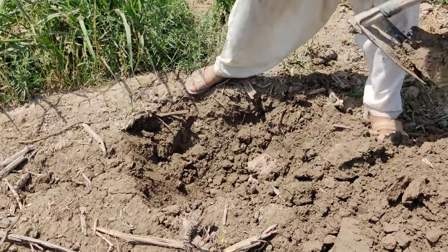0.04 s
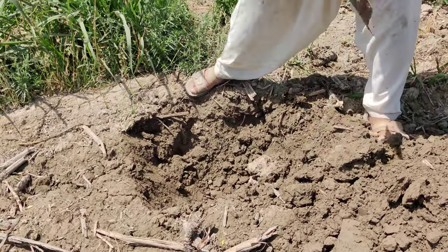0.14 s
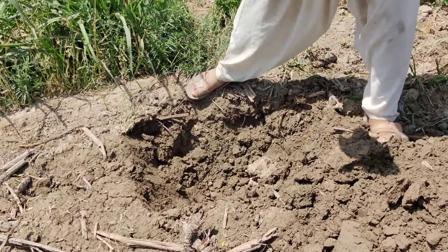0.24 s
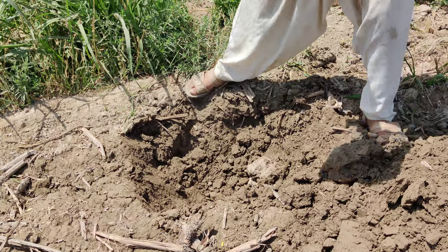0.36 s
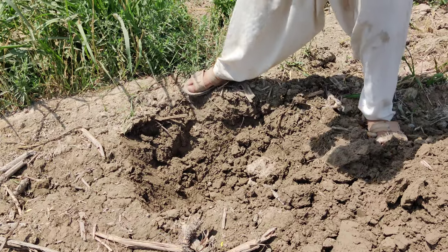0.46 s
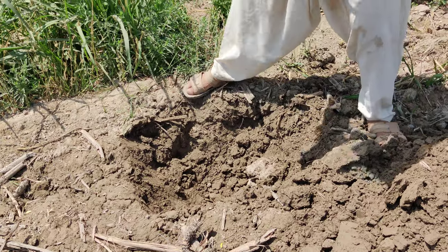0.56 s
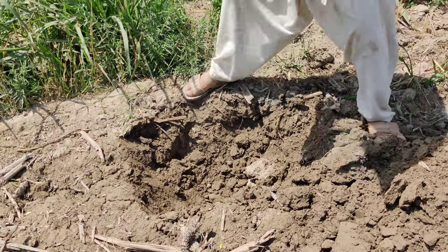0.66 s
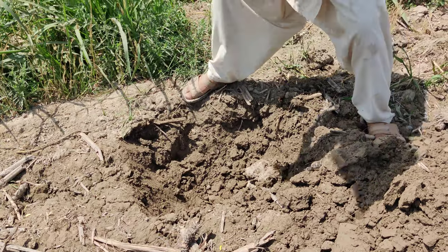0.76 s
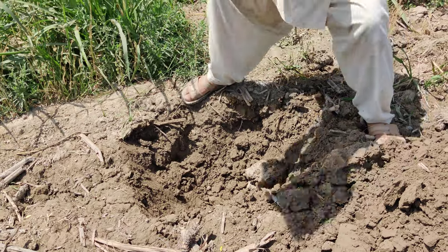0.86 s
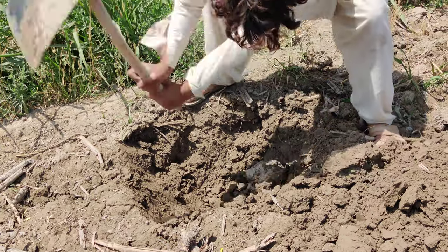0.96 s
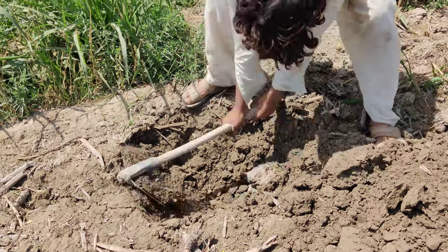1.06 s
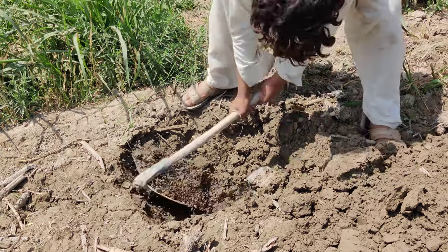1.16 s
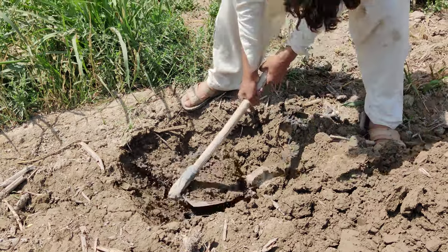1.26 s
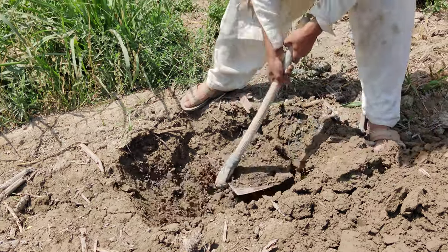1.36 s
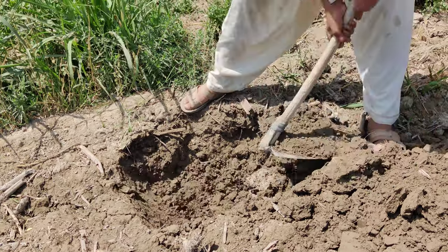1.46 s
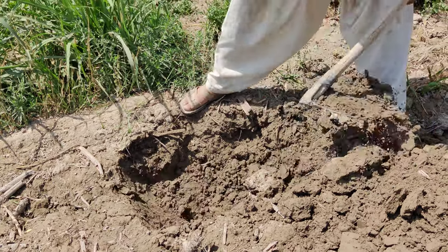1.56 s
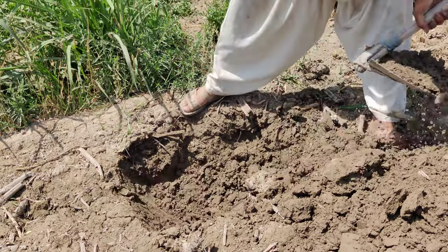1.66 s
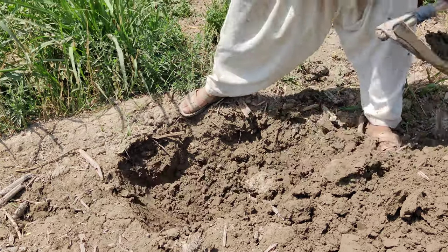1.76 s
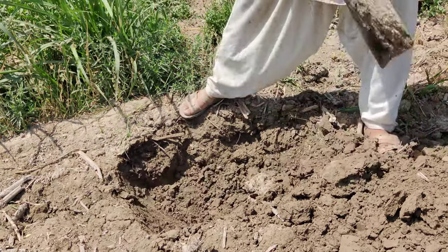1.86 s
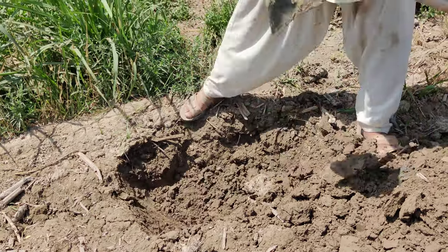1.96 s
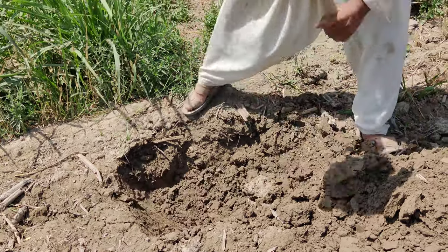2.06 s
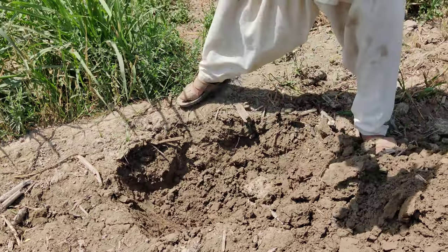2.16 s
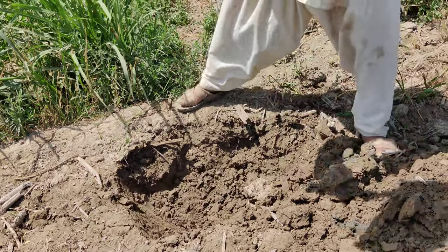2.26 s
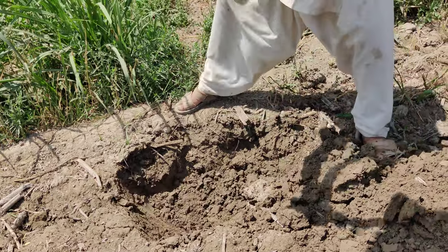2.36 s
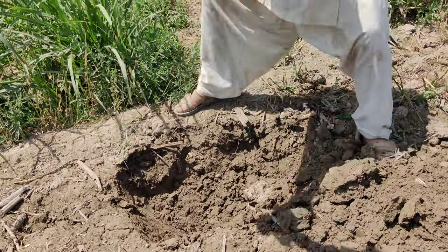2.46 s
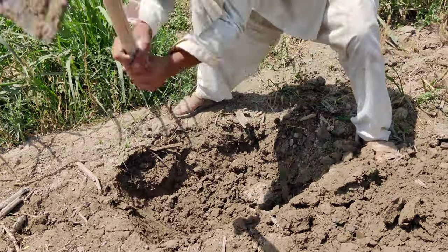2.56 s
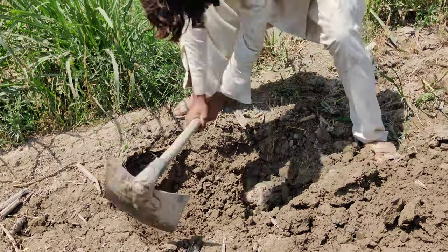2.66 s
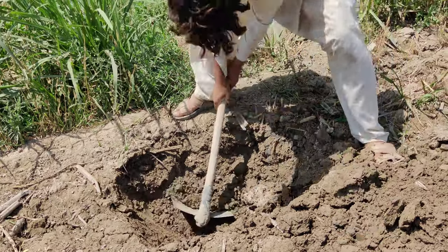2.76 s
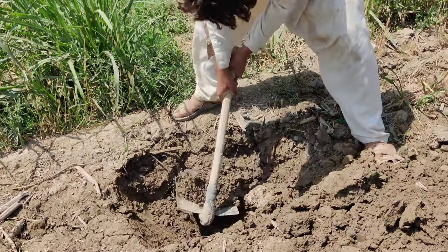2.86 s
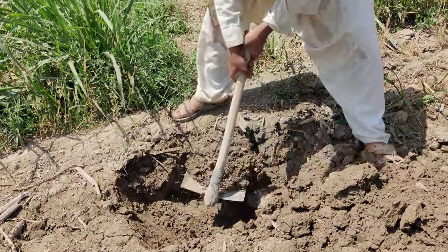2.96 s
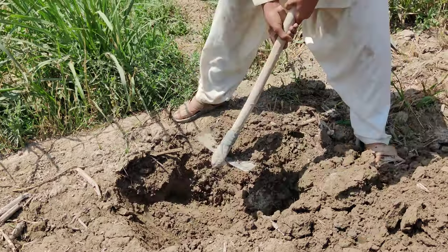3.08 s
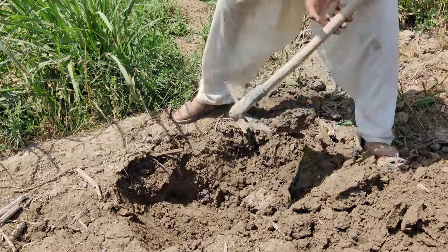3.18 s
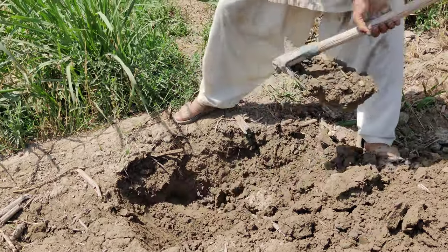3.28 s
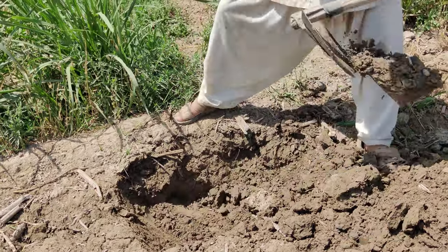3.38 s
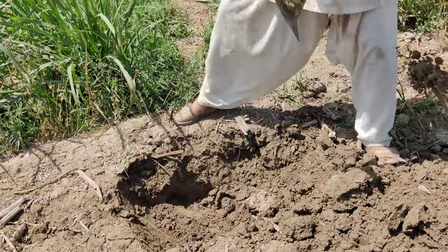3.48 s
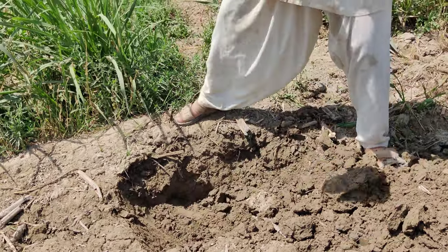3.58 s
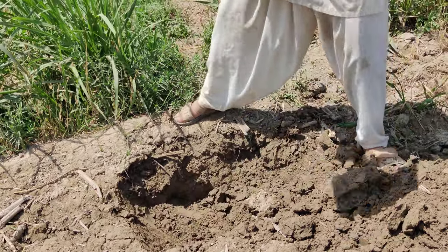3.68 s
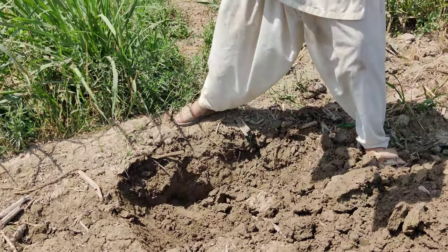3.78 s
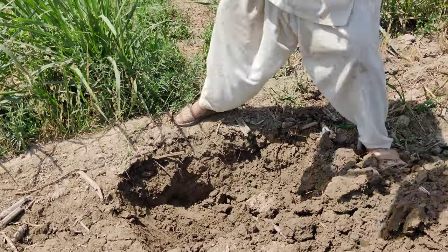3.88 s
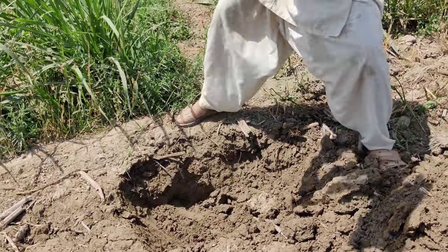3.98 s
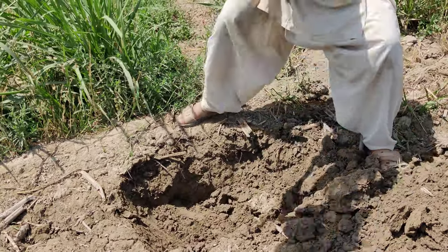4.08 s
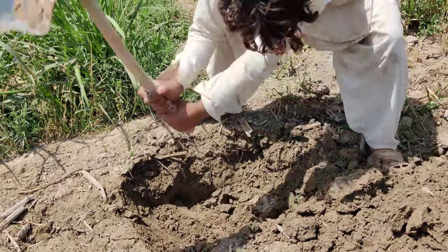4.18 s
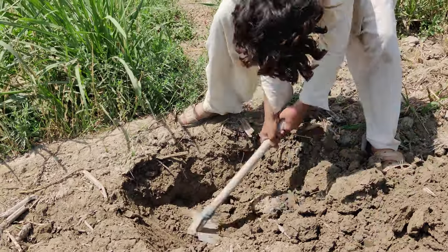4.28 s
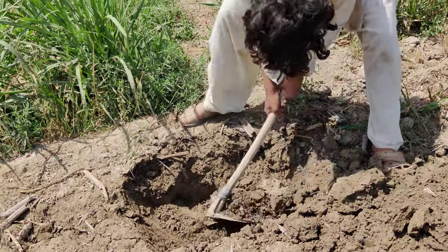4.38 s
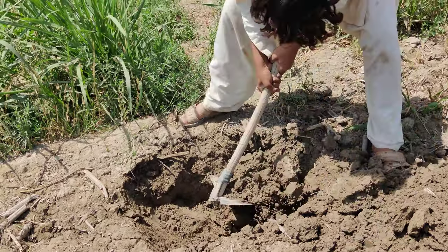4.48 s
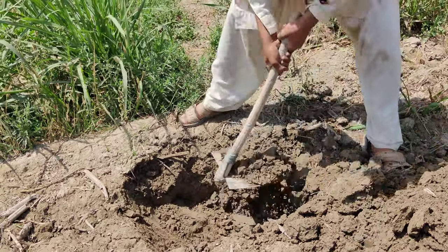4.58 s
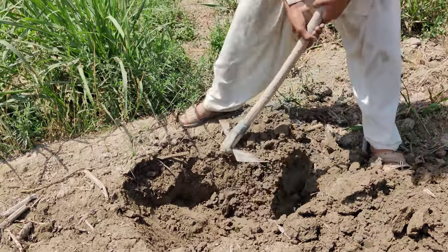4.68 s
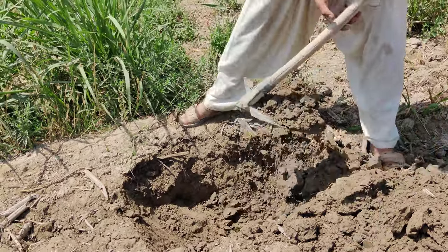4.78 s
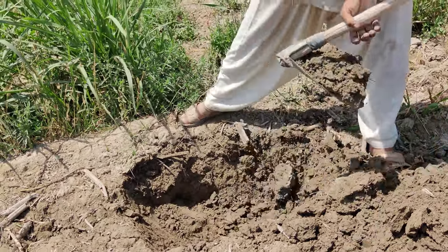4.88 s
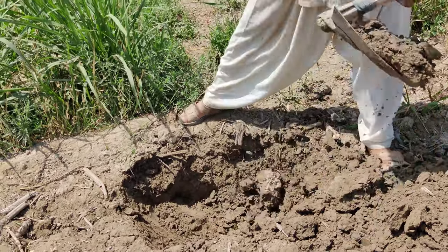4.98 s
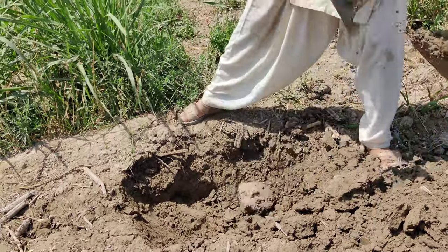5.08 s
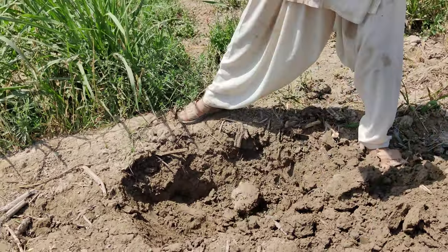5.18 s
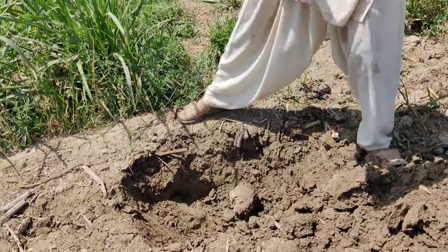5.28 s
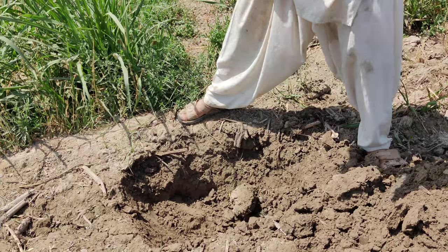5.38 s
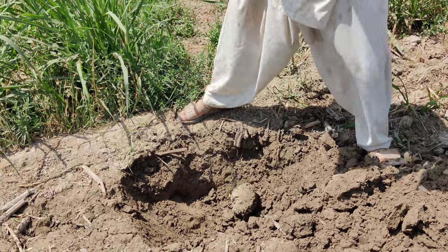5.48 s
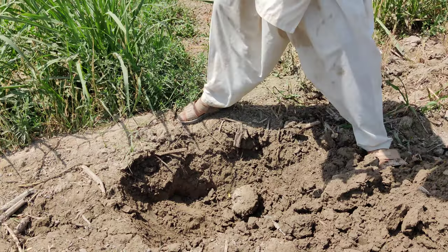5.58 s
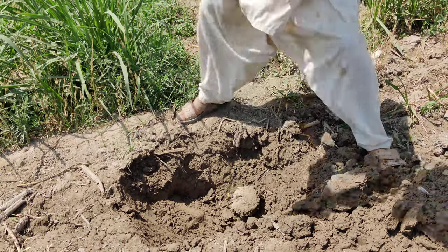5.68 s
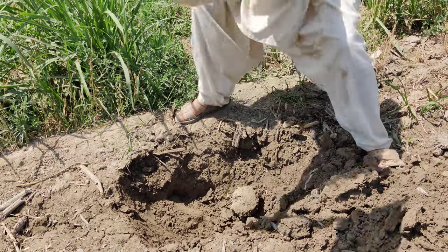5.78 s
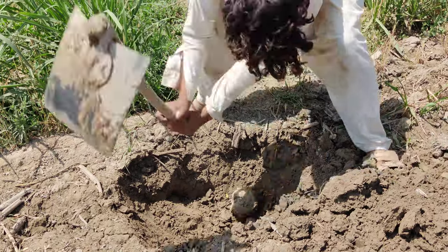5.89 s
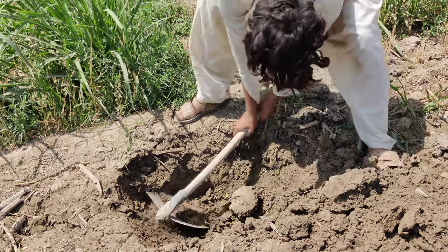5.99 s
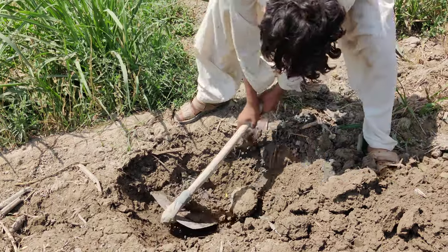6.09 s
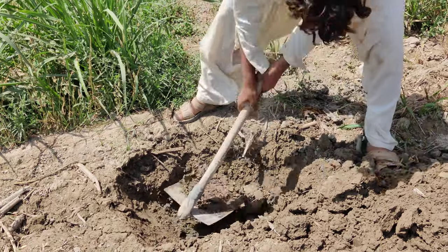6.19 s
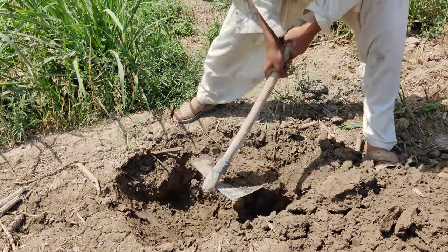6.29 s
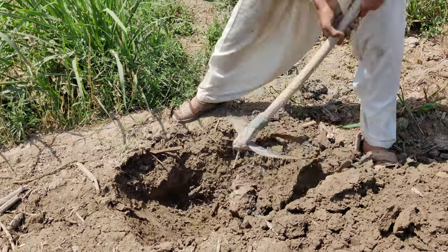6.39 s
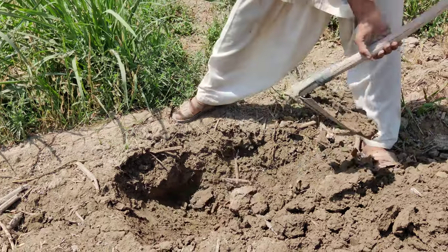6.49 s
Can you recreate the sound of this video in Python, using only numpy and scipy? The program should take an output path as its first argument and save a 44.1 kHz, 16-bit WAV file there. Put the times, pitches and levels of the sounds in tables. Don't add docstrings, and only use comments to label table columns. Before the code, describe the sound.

A hand hoe chops crusty dry soil in four steady, crunching blows, with crumbs scattering between them while a bird whistles over an open field.

```python
import sys
import numpy as np
from scipy import signal
from scipy.fft import rfft, irfft, next_fast_len
from scipy.io import wavfile
from scipy.ndimage import uniform_filter1d, map_coordinates

SR = 44100
rng = np.random.default_rng(int(sys.argv[2]) if len(sys.argv) > 2 else 0)


def gain_from_decibels(decibels):
    exponent = np.asarray(decibels, float) / 20
    return 10 ** exponent


def unload_audio(sound):
    columns = np.transpose(np.atleast_2d(sound))
    steps = np.round(np.clip(columns, -1, 1) * 32767)
    wavfile.write(sys.argv[1], SR, steps.astype(np.int16))


N = 288414


def unit(x):
    return x / np.sqrt(np.mean(x ** 2) + 1e-20)


def along(points, hz):
    f, v = np.transpose(points)
    return np.interp(np.log(hz + 1), np.log(f + 1), v)


def curves(rows):
    s, *cols = np.transpose(rows)
    return [np.interp(np.arange(N) / SR, s, c) for c in cols]


def wobble(rate_hz):
    knots = rng.standard_normal(int(N * rate_hz / SR) + 4)
    return map_coordinates(knots, [np.arange(N) * rate_hz / SR])


def filtered(x, response):
    n = x.shape[-1]
    m = next_fast_len(n + 4096)
    return irfft(rfft(x, m) * response(np.fft.rfftfreq(m, 1 / SR)), m)[..., :n]


def rush(spectrum, grain_db=0, rate_hz=300):
    # [f/Hz, correlation]
    alike = [(30, .72), (70, .92), (180, .95), (550, .55), (1650, .25), (4000, 0)]
    pair = rng.standard_normal((2, N)) * gain_from_decibels(grain_db * wobble(rate_hz))

    def mid_side(hz):
        turn = np.arccos(np.clip(along(alike, hz), -1, 1)) / 2
        return gain_from_decibels(along(spectrum, hz)) * [np.cos(turn), np.sin(turn)]

    mid, side = filtered(pair, mid_side)
    return unit(np.array([mid + side, mid - side]))


def ports(x, left_db, lead_s):
    half = np.array([[.5], [-.5]])
    return filtered(x, lambda hz: gain_from_decibels(half * left_db) * np.exp(2j * np.pi * hz * half * lead_s))


def add(track, s, x):
    part = track[..., round(s * SR):][..., :x.shape[-1]]
    part += x[..., :part.shape[-1]]


def field():
    # [t/s, level/dB]
    breeze = [(0, -45.5), (.6, -44.5), (.9, -50), (1.11, -42), (1.5, -52), (2.15, -53.5), (2.44, -46),
              (2.79, -46.5), (2.97, -42), (3.41, -48.5), (3.7, -52), (4.2, -45.5), (4.6, -48),
              (5.05, -48.5), (5.25, -58), (5.5, -50.5), (6.54, -42)]
    # [f/Hz, density/dB]
    drone_spectrum = [(10, -12), (22, -1), (30, 4), (36, -8), (48, -9), (62, -30), (150, -120)]
    rumble_spectrum = [(26, -60), (45, -1), (66, -7), (119, -15), (175, -21.5), (230, -33), (450, -41.5),
                       (880, -120)]
    air_spectrum = [(250, -0.5), (500, -23), (1300, -6.5), (2600, -26), (6300, -21), (7300, -19),
                    (14300, -14.5), (15100, -25)]
    breeze_db, = curves(breeze)
    swing_db = breeze_db - breeze_db.mean()
    drone_db = breeze_db + 1 + 1.7 * wobble(2.6)
    drone = gain_from_decibels(drone_db) * rush(drone_spectrum) * gain_from_decibels([[2.1], [-2.1]])
    rumble_db = breeze_db.mean() - 1 + 0.26 * swing_db + 2.44 * wobble(25)
    rumble = gain_from_decibels(rumble_db) * rush(rumble_spectrum) * gain_from_decibels([[1.3], [-1.3]])
    air_db = -69 + 0.23 * swing_db + .6 * wobble(3.3)
    air = gain_from_decibels(air_db) * rush(air_spectrum) * gain_from_decibels([[.4], [-.4]])
    return drone + rumble + air


def whistle(s, hz, db):
    t = np.arange(s[0], s[-1], 1 / SR)
    phase = 2 * np.pi * np.cumsum(np.interp(t, s, hz)) / SR
    return gain_from_decibels(np.interp(t, s, db)) * np.sin(phase)


def birds():
    # [t from top note/s, f/Hz, level/dB]
    hook = [(-.15, 3700, -22), (-.142, 4000, 6), (-.128, 4500, 9.5), (-.115, 4450, 7), (-.104, 4330, -15)]
    sweep = [(-.098, 3207, -28), (-.088, 3450, -7.5), (-.065, 3805, 1.5), (-.04, 4100, 5),
             (-.02, 4550, 6.5), (0, 5350, 2.5), (.006, 5460, -4), (.018, 5350, -24)]
    # [t of top note/s, level/dB, hook/dB, echo/dB, pitch ratio]
    calls = [
        (0.75, -51.5, -20, -4, 1.03),
        (1.652, -55, -15, 1, 1.02),
        (2.797, -52.5, -6.5, 1, 0.99),
        (3.643, -52.5, -10.5, -2.5, 1.01),
        (4.622, -51.5, -10.5, -1.5, 1.02),
        (5.621, -58.5, -35, 7, 0.99),
    ]
    # [t/s, length/s, from f/Hz, to f/Hz, level/dB]
    peeps = [(.01, 0.01, 2390, 2230, -57), (0.101, 0.019, 2500, 2150, -59),
             (0.156, 0.046, 1970, 1680, -59.5), (0.288, 0.045, 3050, 1930, -60),
             (0.929, 0.041, 1400, 1105, -65), (1.005, 0.04, 2800, 1870, -61.5),
             (1.025, .025, 3800, 3220, -65), (2.123, 0.033, 2080, 1885, -53),
             (3.642, 0.0403, 2850, 2480, -70), (4.449, 0.039, 2170, 1900, -58),
             (4.618, 0.05, 2025, 1860, -63.5), (5.698, .012, 5050, 4000, -58),
             (5.706, 0.014, 3750, 3900, -53)]
    echo_s, hook_echo_db, flutter_db, scatter_db = .042, 1, 2.5, -11
    direct, echo, far = np.zeros((3, N))
    s, hz, level_db = np.transpose(hook + sweep)
    opening = np.arange(len(s)) < len(hook)
    for top, db, opening_db, echo_db, ratio in calls:
        level = level_db + db + opening * opening_db
        call = whistle(s, hz * ratio, level + rng.normal(0, 1.5, len(s)))
        add(direct, top + s[0], call)
        reply_db = level + echo_db + hook_echo_db * opening + rng.normal(0, 2, len(s))
        add(echo, top + s[0] + echo_s, whistle(s, hz * ratio, reply_db))
    for start, length, from_hz, to_hz, db in peeps:
        note = whistle([0, length], [from_hz, to_hz], [db, db])
        add(far, start, note * np.hanning(len(np.arange(0, length, 1 / SR))) ** .5)
    direct, echo = [part * gain_from_decibels(flutter_db * (wobble(45) + 0.43 * wobble(150))) for part in (direct, echo)]
    echo_spectrum = [(3500, -13), (4100, -18), (4700, -10.5), (5400, -3.0)]  # [f/Hz, gain/dB]
    echo = filtered(echo, lambda f: gain_from_decibels(along(echo_spectrum, f)))
    near = ports(direct, left_db=-6, lead_s=-.0001) + ports(echo, left_db=1, lead_s=0)
    t = np.arange(SR // 6) / SR
    leaves = rng.standard_normal((2, len(t))) * gain_from_decibels(-60 * t / .2)
    leaves = leaves / np.linalg.norm(leaves[0])
    wet = signal.fftconvolve((direct + echo)[None], leaves, axes=1)[:, :N]
    return near + gain_from_decibels(scatter_db) * wet + ports(far, left_db=-5.5, lead_s=.0001)


def patchy(x, depth_db):
    z = signal.stft(x, nperseg=256)[2]
    spots = uniform_filter1d(rng.standard_normal(z.shape[1:]), size=5, axis=0)
    spots = uniform_filter1d(spots, size=8, axis=1)
    return signal.istft(z * gain_from_decibels(depth_db * unit(spots)), nperseg=256)[1][:, :N]


def scrapes():
    # [t/s, length/s, f/Hz, width/Hz, level/dB]
    strokes = [(0.244, 0.38, 1290, 220, -66), (0.61, 0.075, 2740, 420, -54.5),
               (2.616, 0.085, 1540, 860, -58.5), (3.771, 0.068, 2200, 400, -62),
               (3.73, 0.063, 4600, 1800, -60), (4.919, 0.09, 6140, 900, -56.5),
               (5.491, 0.073, 4600, 670, -57), (5.728, 0.082, 3600, 900, -63),
               (5.885, 0.061, 950, 660, -58), (5.76, .25, 765, 300, -62), (2.2, 0.13, 1310, 400, -62),
               (0.76, 0.075, 640, 400, -67)]
    out = np.zeros((2, N))
    for s, length, hz, width, db in strokes:
        noise = rng.standard_normal((2, SR // 2))
        ring = unit(filtered(noise, lambda f: (1j * f * width / (hz * hz - f * f + 1j * f * width)) ** 2))
        swell = np.hanning(round(length * SR))
        add(out, s, gain_from_decibels(db) * ring[:, :len(swell)] * swell)
    return out


def swells(rows):
    s, rise, fall, db = np.transpose(rows)[:4, :, None]
    t = np.arange(0, N / SR, 1e-3)
    return gain_from_decibels(db - 20 * np.maximum((s - t) / rise, (t - s) / fall) ** 1.123)


def loose_earth():
    # [t of peak/s, 20 dB rise/s, 20 dB fall/s, level/dB]
    tumbles = [(.02, 0.16, 0.43, -62), (.33, 0.11, 1, -69), (.62, 0.87, 0.43, -61.5),
               (.964, 0.049, 0.23, -64.5), (1.19, 0.27, 0.95, -66.5), (1.56, 0.18, 0.21, -61.5),
               (1.77, 1, 0.34, -64.5), (2.136, .08, 0.72, -60.5), (2.38, 0.75, 0.083, -63.5),
               (2.654, 0.16, 0.75, -62), (3., 0.33, 1, -64), (3.67, 0.12, 0.98, -61.5),
               (3.92, 0.083, 0.42, -60), (4.2, 0.16, 0.22, -63.5), (4.36, 0.045, 0.2, -61.5),
               (4.75, 0.98, 0.4, -65), (4.956, 0.031, 0.48, -63.5), (5.4, 0.074, 1, -60.5),
               (5.61, 0.3, 0.14, -61), (5.76, 0.44, 0.33, -63.5), (5.98, 0.45, 0.33, -61),
               (6.19, 0.081, 0.53, -69), (6.47, 0.86, 0.15, -64.5)]
    # [t of peak/s, 20 dB rise/s, 20 dB fall/s, sand level/dB, fineness/dB]
    showers = [(0.018, 0.035, 0.12, -65.5, 6.5), (.662, 0.17, 0.084, -60.5, 2.5), (.964, .12, 0.38, -89, 9),
               (1.56, 0.065, 0.072, -66.5, 1), (1.76, 0.087, 0.025, -61.5, 13), (1.8, .05, 0.15, -73.5, 3),
               (2.136, 0.024, 0.4, -71, 2.5), (2.378, 0.19, 0.08, -58.5, 4.5),
               (2.654, 0.12, 0.14, -68.5, 0), (3.268, 0.25, 0.16, -72.5, 8), (3.1, 0.17, 1, -76, -1),
               (3.792, 0.12, 0.35, -68.5, 4.5), (3.919, 0.08, 0.027, -60.5, 3.5),
               (4.238, 0.16, 0.11, -77, 1), (4.36, 0.038, 0.23, -69, 2.5), (4.85, 0.22, 0.045, -74, 6.5),
               (4.957, 0.021, 0.19, -68.5, 4), (5.49, 0.15, 0.32, -67.5, 4.5), (5.59, .12, .07, -62, 3),
               (5.75, 0.94, 0.1, -72.5, 0), (5.98, 0.19, 0.2, -74.5, -2), (6.14, 0.12, 0.041, -73, 6.5),
               (6.25, .1, 0.69, -80, 1.5), (6.5, 0.066, 0.085, -67, 7)]
    # clods, grit, sand, dust [level/dB]
    trickle_db = [-73, -77.5, -79, -87]
    # [f/Hz, density/dB]
    clod_spectrum = [(120, -10), (300, -3), (1000, -6), (1800, -15), (4000, -70)]
    grit_spectrum = [(800, -90), (1800, 0), (3000, 0), (4500, 0), (8000, -25.5)]
    sand_spectrum = [(2600, -70), (4800, -1.5), (6100, 0), (7000, -5.5), (9500, -20.5)]
    dust_spectrum = [(5000, -50), (8000, 0), (12000, -2), (14800, -4), (15600, -12)]
    lumps, shower = swells(tumbles), swells(showers)
    fine_db = np.transpose(showers)[4][:, None]
    lump_grit = lumps * gain_from_decibels(-10.5)
    shower_grit = shower * gain_from_decibels(-0.5 - 0.22 * fine_db)
    parts = [lumps, np.vstack([lump_grit, shower_grit]), shower, shower * gain_from_decibels(fine_db)]
    power = [(part ** 2).sum(axis=0) + gain_from_decibels(2 * db) for part, db in zip(parts, trickle_db)]
    clods, grit, sand, dust = [np.interp(np.arange(N) / N * len(p), np.arange(len(p)), np.sqrt(p))
                               for p in power]
    low = clods * rush(clod_spectrum, grain_db=1.5, rate_hz=480)
    low = low + grit * gain_from_decibels(6.5) * rush(grit_spectrum, grain_db=1.0, rate_hz=57)
    high = sand * gain_from_decibels(7) * rush(sand_spectrum, grain_db=2.0, rate_hz=270)
    high = high + dust * rush(dust_spectrum, grain_db=3, rate_hz=300)
    return patchy(low + high, depth_db=2.0) + scrapes()


def ticks():
    # [t/s, peak/dB, f/Hz, crispness/dB]
    crumbs = [(0.238, -47.5, 1180, -29), (1.481, -46, 401, -32), (1.533, -43, 401, -32),
              (1.548, -42, 700, 1), (1.563, -37, 380, -11), (1.623, -56, 427, 13), (2.07, -70, 394, -21),
              (2.104, -47, 453, -32), (2.129, -45, 2040, -13), (2.324, -43.5, 1106, -12),
              (2.916, -32.5, 706, -14), (2.964, -55, 417, -17), (3.641, -43, 390, -29),
              (3.696, -50, 4200, -20), (3.911, -39, 890, -11), (3.916, -37.5, 2780, -10),
              (4.94, -50.5, 1360, -24), (5.256, -53, 1200, -30), (5.338, -47.5, 796, -33),
              (5.398, -51, 524, -36), (5.457, -40, 600, -38), (5.486, -35.5, 414, -50),
              (5.703, -48, 440, -23), (5.909, -62, 468, -27), (6.259, -45, 403, -24)]
    # [f/Hz, density/dB]
    puff_spectrum = [(700, -24), (1500, -1), (5500, 2), (9000, -44)]
    out, t = np.zeros(N), np.arange(SR // 30) / SR
    for s, db, hz, crisp_db in crumbs:
        puff, spark = rng.standard_normal((2, len(t)))
        tap = np.sin(2 * np.pi * hz * t) * gain_from_decibels(-60 * t / 0.011)
        grit = unit(filtered(puff, lambda f: gain_from_decibels(along(puff_spectrum, f))))
        grit = grit * gain_from_decibels(-1.5 + 0.45 * crisp_db - 60 * t / 0.014)
        snap = unit(np.diff(spark, n=3, prepend=[0, 0, 0])) * gain_from_decibels(4 + crisp_db - 60 * t / 0.0063)
        add(out, s, gain_from_decibels(db) * (tap + grit + snap))
    return out


def knocks():
    # [t/s, peak/dB, f/Hz, t60/s, first swing +1 or -1]
    hits = [(1.1209, -15, 142, 0.031, -1), (1.15, -29, 5800, .012, 1), (1.1321, -13, 160, 0.011, -1),
            (1.129, -26, 330, 0.1, -1), (1.1345, -4.5, 112, 0.013, 1), (1.123, -27, 1030, 0.048, 1),
            (1.128, -28.5, 700, .05, -1), (1.136, -23.5, 790, 0.021, 1), (1.148, -28.5, 64, 0.11, 1),
            (2.8092, -34.5, 2620, .025, 1), (2.811, -19, 418, 0.052, -1), (2.8119, -26, 1760, 0.035, 1),
            (2.8113, -19.5, 940, 0.021, -1), (2.816, -21.5, 133, 0.079, -1), (2.834, -17.5, 154, 0.014, -1),
            (2.8343, -27, 690, 0.025, -1), (2.836, -27.5, 46, 0.11, 1), (4.3748, -21, 396, 0.056, 1),
            (4.378, -14.5, 122, 0.097, 1), (4.3837, -11, 960, 0.012, -1), (4.3858, -20, 714, 0.042, 1),
            (4.3873, -14.5, 820, 0.008, 1), (4.3856, -13, 174, 0.017, 1), (4.3886, -18, 200, 0.063, 1),
            (4.3923, -14, 77, 0.052, -1), (4.3994, -23, 153, 0.055, 1), (4.392, -25, 47, 0.14, -1),
            (6.06, -19, 455, 0.035, -1), (6.0605, -15, 624, 0.026, -1), (6.066, -10, 205, 0.018, -1),
            (6.0753, -14, 740, 0.012, 1), (6.0757, -13.5, 119, 0.041, -1), (6.079, -26, 290, 0.038, 1),
            (6.0775, -22.5, 195, .06, -1), (6.064, -26, 753, .04, 1)]
    thuds = [
        (0.963, -28, 39.6, 0.12, 1),
        (1.22, -27.5, 41.8, 0.1, -1),
        (1.739, -29, 32.3, 0.14, -1),
        (2.117, -29, 60, .035, 1),
        (3.729, -35.5, 40, 0.11, 1),
        (5.03, -36, 38, 0.092, 1),
        (6.2, -34, 40, 0.09, -1),
    ]
    out, t = np.zeros(N), np.arange(SR // 3) / SR
    for s, db, hz, t60, swing in hits + thuds:
        decay = np.sign(swing) * gain_from_decibels(db - 60 * t / t60)
        onset = 1 - np.exp(-t * hz * 6)
        add(out, s, decay * np.sin(2 * np.pi * hz * t) * onset)
    return out


def crunches():
    # [t/s, level/dB, t60/s, tilt/(dB/octave), blade ring/dB]
    cracks = [(1.1189, -24, 0.023, 0, -20), (1.124, -24.5, 0.041, 2, -33), (1.1331, -30.5, 0.028, -8, -2.5),
              (1.146, -48, 0.15, -3, -32), (2.808, -32.5, 0.028, 2.5, 3), (2.812, -26, 0.031, -2.5, -24),
              (2.82, -44.5, 0.15, -2.5, -36), (2.835, -36, .04, -12, -24), (4.372, -27.5, 0.054, -2, -9),
              (4.376, -25.5, 0.049, -4.5, -9), (4.38, -23, 0.023, -6.5, -24), (4.384, -24, 0.07, -10, -30),
              (4.395, -40, 0.14, -11, -22), (6.0583, -28, 0.029, -5.5, 0), (6.059, -21, 0.014, -3.5, -2.5),
              (6.066, -25, 0.06, -5, -11.5), (6.0728, -23, 0.018, -4.5, -11),
              (6.08, -31.5, 0.052, -10.5, -32), (6.099, -47.5, 0.07, 0, -15)]
    # [f/Hz, width/Hz, level/dB]
    blade_modes = [(1910, 26, -29), (2333, 323, 12.5), (2486, 920, 7.5), (4170, 460, 6), (6020, 110, 1.5),
                   (9700, 900, -6)]
    # [t/s, pitch ratio]
    blade_pitch = [(1.1, 1.04), (2.8, 0.95), (4.3, 0.896), (6, .99)]
    # [f/Hz, density/dB]
    soil = [(150, -14.5), (550, 1.5), (1200, 3), (2500, -3), (6000, -4), (8000, -13), (14000, -14),
            (16500, -46)]
    out, t = np.zeros((2, N)), np.arange(SR // 5) / SR

    def modes(f):
        return sum((-1) ** k * gain_from_decibels(db) * 1j * f * w / (c * c - f * f + 1j * f * w)
                   for k, (c, w, db) in enumerate(blade_modes))

    for s, db, t60, tilt_db, ring_db in cracks:
        ratio = [r for start, r in blade_pitch if start < s][-1]
        rise_s = 0.0027 * np.sqrt(t60 / 0.03)
        shared, left, right, grain = rng.standard_normal((4, len(t)))
        noise = shared + .5 * np.diff([left, right], prepend=0)
        noise = noise * gain_from_decibels(12 * uniform_filter1d(grain, size=24))
        crust = unit(filtered(noise, lambda hz: gain_from_decibels(along(soil, hz) + tilt_db * np.log2((hz + 50) / 2500))))
        shape = np.minimum(t / rise_s, 1) * gain_from_decibels(-60 * np.maximum(t - rise_s, 0) / t60)
        ring = filtered(unit(noise) * shape, lambda f: modes(f / ratio)) * 3
        add(out, s, gain_from_decibels(db) * (crust * shape + gain_from_decibels(ring_db) * ring))
    return out


def blade_ports(x):
    # [f/Hz, left minus right/dB]
    left_db = [(60, 2.5), (130, 2.5), (260, 0), (430, 0), (700, 4), (1500, 4), (3000, 2), (4500, 6),
               (7000, 4), (15000, 1.5)]
    # [f/Hz, left port lead/rad]
    lead_rad = [(60, .2), (300, .1), (700, 1), (2000, 1.3), (3200, 1.8), (4200, 4.6), (8000, 6),
                (16000, 14)]
    half = np.array([[.5], [-.5]])
    return filtered(x, lambda hz: gain_from_decibels(half * along(left_db, hz)) * np.exp(1j * half * along(lead_rad, hz)))


def scene():
    top_hz = 15620
    hoe = blade_ports(crunches() + knocks())
    earth = ports(ticks(), left_db=3.5, lead_s=.0001) + loose_earth() * gain_from_decibels([[.5], [-.5]])
    rest = earth + birds() + field()
    hoe = filtered(hoe, lambda hz: np.clip((top_hz + 800 - hz) / 500, 0, 1))
    return hoe + filtered(rest, lambda hz: hz < top_hz)


def sparse_treble(x):
    above_hz, weak_share, cut_db = 7400, .83, -24
    hz, _, z = signal.stft(x, SR, nperseg=1024)
    level = uniform_filter1d(np.abs(z.sum(axis=0)), size=4, axis=1)
    level = uniform_filter1d(level, size=2, axis=0)
    weak = level / uniform_filter1d(level, size=30, axis=0).clip(1e-12)
    cut = 1 / (1 + np.exp(np.clip(20 * (weak - weak_share), -30, 30))) * (hz > above_hz)[:, None]
    treble = level[hz > above_hz].mean(axis=0)
    cut = cut * (treble < 5 * np.median(treble))
    return signal.istft(z * gain_from_decibels(cut_db * cut), SR, nperseg=1024)[1][:, :N]


def roll_off(x):
    return signal.sosfilt(signal.butter(12, 16510, fs=SR, output="sos"), x)


def record(dry):
    mix = sparse_treble(dry)
    return roll_off(mix)


dry = scene()
out = record(dry)
unload_audio(out)
```